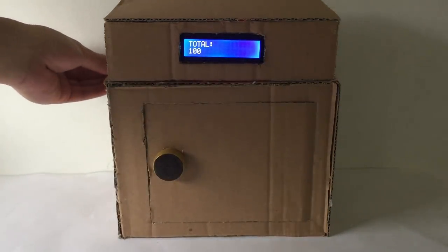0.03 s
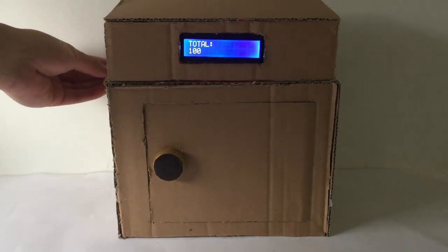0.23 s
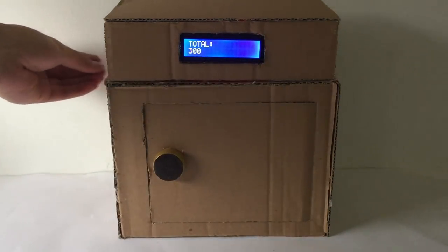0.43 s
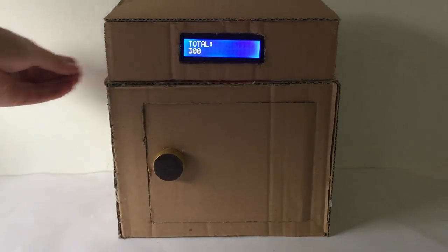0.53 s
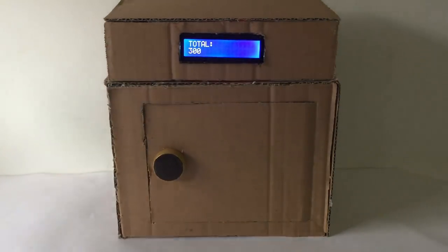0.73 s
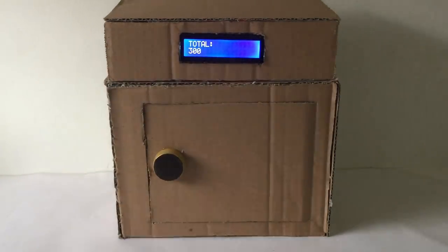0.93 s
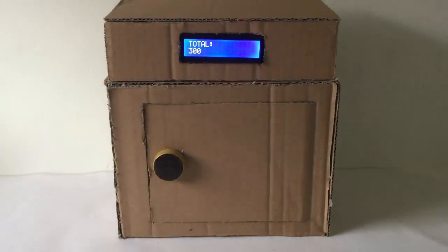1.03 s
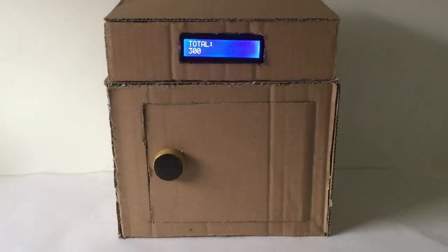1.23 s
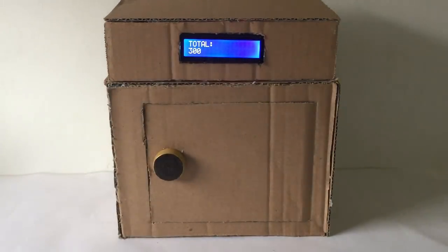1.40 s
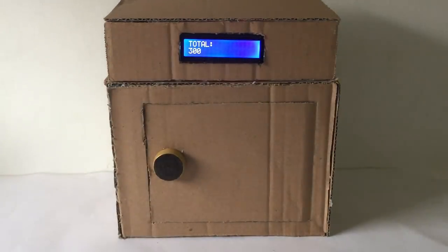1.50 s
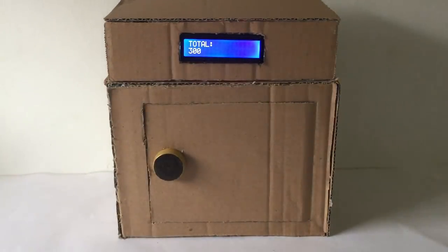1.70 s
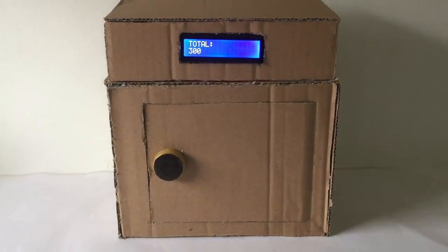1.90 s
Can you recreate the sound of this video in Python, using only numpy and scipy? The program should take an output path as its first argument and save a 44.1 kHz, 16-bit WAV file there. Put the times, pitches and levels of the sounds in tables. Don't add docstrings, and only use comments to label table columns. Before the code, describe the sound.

Close up in a quiet, slightly live room, fingers softly bump a hollow carton, a coin strikes inside with quick dwindling bounces, then low hiss, faint distant squeaks and a small cardboard crackle near the end.

```python
import sys
import numpy as np
from scipy import signal
from scipy.fft import rfft, irfft
from scipy.io import wavfile
from scipy.ndimage import uniform_filter1d

SR = 44100
rng = np.random.default_rng(int(sys.argv[2]) if len(sys.argv) > 2 else 0)


def pcm_store(signal):
    levels = np.round(np.clip(np.atleast_2d(signal), -1, 1) * 32767)
    wavfile.write(sys.argv[1], SR, levels.astype(np.int16).T)


def makeup_ratio(level_db):
    decades = np.asarray(level_db, float) / 20
    return 10 ** decades


N = 85995

# pitch_hz, level_db, t60_s
BODY_MODES = [(145, 4, .06), (304, 1.5, 0.064), (343.3, 2, 0.064), (436, -5.5, 0.049), (570, -8, 0.048),
              (648, -16, .03)]


def evened(x):
    return x / np.sqrt(np.mean(x ** 2) + 1e-20)


def read(points, hz):
    f, value = np.transpose(points)
    return np.interp(np.log(hz + 1), np.log(f + 1), value)


def add(mix, start_s, sound):
    part = mix[round(start_s * SR):][:len(sound)]
    part += sound[:len(part)]


def decay(t_s, t60_s):
    return makeup_ratio(-60 * np.maximum(t_s, 0) / t60_s)


def high_pass(x, order, cut_hz):
    return signal.sosfilt(signal.butter(order, cut_hz, "high", fs=SR, output="sos"), x)


def coloured(x, shape):
    hz = np.fft.rfftfreq(len(x), 1 / SR)
    return irfft(rfft(x) * makeup_ratio(read(shape, hz)), len(x))


def noise(shape, size, patchy_db, wide, swell_db):
    frames, hz = 4 * N // size + 5, np.fft.rfftfreq(size, 1 / SR)
    real, imag, patches = rng.standard_normal((frames, len(hz), 3)).T
    patches = uniform_filter1d(patches, wide, 0)
    patches = evened(uniform_filter1d(patches, 8, 1))
    swell = evened(uniform_filter1d(rng.standard_normal(frames), 6))
    level_db = read(shape, hz)[:, None] + patchy_db * patches + swell_db * swell
    spectra = (real + 1j * imag) * makeup_ratio(level_db)
    return evened(signal.istft(spectra, nperseg=size, noverlap=3 * size // 4)[1][:N])


def ring(modes, length_s):
    t = np.arange(0, length_s, 1 / SR)
    return sum(makeup_ratio(db - 60 * t / t60_s) * np.sin(2 * np.pi * hz * t) for hz, db, t60_s in modes)


def struck(modes):
    return [(hz * rng.uniform(.99, 1.01), db + 6 * rng.standard_normal(), t60_s) for hz, db, t60_s in modes]


def chatter(contact_s):
    contacts_per_s = 4000
    t = np.arange(1024) / SR
    hit = rng.random(1024) < contacts_per_s / SR
    train = rng.standard_normal(1024) * hit * np.exp(-(t / contact_s) ** 2)
    train[0] = 0.23
    return train / np.linalg.norm(train)


def crack(contact_s, shape, front_db):
    rise_s, t60_s = .0008, .03
    front_cut_hz, front_rise_s, front_t60_s = 5130, .00068, .008
    t = np.arange(4096) / SR
    burst = evened(coloured(rng.standard_normal(4096), shape))
    front = high_pass(burst[::-1], 2, front_cut_hz)
    front = front * makeup_ratio(front_db) * decay(t, front_t60_s) * np.minimum(t / front_rise_s, 1)
    return burst * np.minimum(t / rise_s, 1) * decay(t - contact_s, t60_s) + front


def hiss():
    # pitch_hz, level_db (per Hz)
    air_shape = [(150, -32), (250, 3.5), (491, -10), (584, 0), (671, -11.5), (732, -6), (1410, -10),
                 (2830, -12.5), (15700, -24.5)]
    return makeup_ratio(-69) * noise(air_shape, size=1024, patchy_db=1.5, wide=14, swell_db=-0.24)


def rumble():
    # pitch_hz, level_db (per Hz)
    rumble_shape = [(13, -48), (22, -22), (34, -28), (63, 0.5), (156, -1), (173, -3.5), (215, -16),
                    (301, -25), (330, -23), (430, -57), (730, -120)]
    return makeup_ratio(-58) * noise(rumble_shape, size=2048, patchy_db=1.3, wide=3, swell_db=.8)


def squeaks():
    # start_s, length_s, pitch_hz, level_db
    squeak_events = [
        (1.40, .15, 995, -72),
        (1.62, .06, 1090, -70),
        (1.63, .04, 2800, -71),
        (1.68, .05, 2830, -75),
        (1.75, .07, 2835, -75),
        (1.20, .05, 1300, -73),
    ]
    out = np.zeros(N)
    for start_s, length_s, hz, db in squeak_events:
        t = np.arange(0, length_s, 1 / SR)
        waver = evened(uniform_filter1d(rng.standard_normal(len(t)), size=500))
        flutter = evened(uniform_filter1d(rng.standard_normal(len(t)), size=500))
        turns = np.cumsum(hz * (1 + 0.0029 * waver)) / SR
        swell = np.sqrt(abs(np.sin(np.pi * t / length_s)))
        add(out, start_s, makeup_ratio(db + 2.0 * flutter) * swell * np.sin(2 * np.pi * turns))
    return out


def crinkle():
    # start_s, level_db, pitch_hz
    snap_events = [
        (1.9028, -41.5, 3620),
        (1.9095, -55, 3300),
        (1.912, -51, 3900),
        (1.918, -47, 4400),
        (1.9235, -47, 3700),
        (1.931, -56, 4660),
        (1.937, -71, 3750),
        (1.945, -54, 4530),
    ]
    snap_t60_s, click_t60_s, click_db = .006, .0037, -20
    out = np.zeros(N)
    for start_s, db, hz in snap_events:
        partials = [(1, 0), (1.16, -7.5), (1.75, -17)]
        modes = [(ratio * hz, db + part_db, snap_t60_s) for ratio, part_db in partials]
        add(out, start_s, ring(modes, .03))
        click = np.diff(rng.standard_normal(81)) * decay(np.arange(80) / SR, click_t60_s)
        add(out, start_s, makeup_ratio(db + click_db) * click)
    grains = rng.standard_normal(4000) * (rng.random(4000) < .15)
    band = signal.butter(2, [3000, 7500], "band", fs=SR, output="sos")
    add(out, snap_events[0][0], makeup_ratio(-66) * evened(signal.sosfilt(band, grains)))
    return high_pass(out, 4, 2900)


def bumps():
    # start_s, crack_db, body_db, thump_db, contact_s
    touches = [
        (.036, -51.5, -54, -62, 0.012),
        (0.0894, -45, -42, -28.5, .005),
        (1.922, -63, -55, -45.5, 0.036),
    ]
    # pitch_hz, level_db (per Hz)
    slide_shape = [(88, -19), (150, 0), (381, -27), (541, -5), (1240, -16.5), (2210, -25.5), (2970, -28.5),
                   (10000, -36.5), (13000, -64), (22000, -120)]
    # pitch_hz, level_db (per Hz)
    tap_shape = [(150, -12), (500, 4.5), (850, -22), (1250, -11.5), (2000, -19.5), (2500, -30.5),
                 (9000, -34.5), (11000, -57)]
    slide_db, slide_t60_s = -52, .35
    thump_hz, thump_rise_s, thump_t60_s = 172, 0.014, 0.034
    rub = noise(slide_shape, size=256, patchy_db=-6.5, wide=4, swell_db=0.5)
    out = makeup_ratio(slide_db) * decay(np.arange(N) / SR, slide_t60_s) * rub
    t = np.arange(0, .15, 1 / SR)
    thump = np.minimum(t / thump_rise_s, 1) ** 2 * decay(t - thump_rise_s, thump_t60_s)
    thump = thump * np.sin(2 * np.pi * thump_hz * t)
    for start_s, crack_db, body_db, thump_db, contact_s in touches:
        add(out, start_s, makeup_ratio(crack_db) * crack(contact_s, tap_shape, front_db=-2))
        add(out, start_s, makeup_ratio(body_db) * signal.fftconvolve(chatter(contact_s), ring(BODY_MODES, .2)))
        add(out, start_s, -makeup_ratio(thump_db) * thump)
    return out


def strikes():
    # start_s, wall_db, coin_db, body_db, contact_s
    hits = [
        (0.207, -25, -34, -41, .008),
        (0.216, -34, -34, -66, .002),
        (0.2284, -22, -16.5, -31.5, 0.0051),
        (0.2489, -31.5, -28, -40, 0.0052),
        (.2845, -37.5, -58, -51, 0.0093),
        (.3040, -41, -31.5, -48, 0.006),
        (.3285, -33, -40, -38.5, 0.0024),
        (0.341, -46.5, -62, -59.5, 0.0058),
        (.2670, -40.5, -36.5, -60, 0.0012),
        (.3510, -52.5, -41, -54.5, 0.0008),
    ]
    # pitch_hz, level_db, t60_s
    wall_modes = [(700, -8, .018), (1222, -10, .03), (1635, -16, .03), (1995, -15, .025), (2260, -7, .02),
                  (2350, 0, .025), (2630, -7, .018), (3470, -5, .02), (3680, -2, .024), (4850, -5, .02),
                  (5300, -11, .015)]
    # pitch_hz, level_db, t60_s
    coin_modes = [(13900, -16, .06), (14110, -7, .13), (14162, -9, .15), (14415, -10, .2), (14540, -7, .12),
                  (14637, -7, .14), (14740, -12, .08), (14893, -1, .16), (15160, -16, .05),
                  (15350, -22, .08)]
    # pitch_hz, level_db (per Hz)
    crack_shape = [(300, -7), (1000, -8.5), (1800, -12), (2340, -3.5), (4800, -12), (7000, -25.5),
                   (13000, -26.5), (14300, -10), (15700, -45)]
    walls, box, coin = np.zeros((3, N))
    metal = ring(coin_modes, 0.4)
    metal *= np.minimum(np.arange(len(metal)) / SR / .0008, 1)
    for start_s, wall_db, coin_db, body_db, contact_s in hits:
        add(walls, start_s, makeup_ratio(wall_db) * signal.fftconvolve(chatter(contact_s), ring(struck(wall_modes), .1)))
        add(box, start_s, makeup_ratio(wall_db - 3.5) * crack(contact_s, crack_shape, front_db=10.5))
        add(box, start_s, makeup_ratio(body_db) * signal.fftconvolve(chatter(contact_s), ring(BODY_MODES, .2)))
        add(coin, start_s, makeup_ratio(coin_db) * rng.choice([-1, 1]) * metal)
    flat_s, flat_t60_s = .336, .06
    return walls, high_pass(box, 4, 170), coin * decay(np.arange(N) / SR - flat_s, flat_t60_s)


def room(x):
    # pitch_hz, t60_s
    room_t60 = [(200, .3), (500, .42), (1500, .55), (3000, .5), (7000, .35), (14500, .27)]
    taps = np.zeros(SR)
    at = np.arange(200, SR - 20, 20)
    taps[at + rng.integers(0, 20, len(at))] = rng.choice([-1., 1.], len(at))
    hz, t, z = signal.stft(taps, SR, nperseg=256)
    tail = signal.istft(z * makeup_ratio(-60 * t / read(room_t60, hz)[:, None]), SR, nperseg=256)[1]
    return signal.fftconvolve(x, tail / np.linalg.norm(tail))[:N]


def scene():
    # pitch_hz, level_db
    echo_colour = [(200, -2.5), (600, -1.5), (1500, 4.5), (2400, -2.5), (3000, -3.5), (4400, -3.5),
                   (8000, -3), (14000, -2)]
    walls, box, coin = strikes()
    near = box + bumps() + crinkle()
    sent = makeup_ratio(-6.5) * coloured(near + makeup_ratio(-8) * walls, echo_colour)
    wet = room(sent + makeup_ratio(-23) * coin)
    return (walls + near + coin + wet + squeaks() + hiss() + rumble())[None]


def band_limit(x):
    return signal.sosfilt(signal.butter(12, 16640, fs=SR, output="sos"), x)


def record(dry):
    hush_from_s, hush_to_s, hush_above_hz, hush_db = .191, .2035, 2300, -25
    x = high_pass(dry, 2, 27)
    x = signal.oaconvolve(x, signal.firwin(255, 15800, window=("kaiser", 9), fs=SR)[None], "same")
    low = signal.oaconvolve(x, signal.firwin(127, hush_above_hz, fs=SR)[None], "same")
    t = np.arange(N) / SR
    hush = uniform_filter1d(1. * ((t > hush_from_s) & (t < hush_to_s)), size=60)
    return band_limit(low + (x - low) * makeup_ratio(hush_db * hush))


dry = scene()
out = record(dry)
pcm_store(out)
```